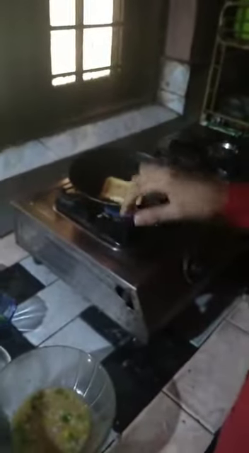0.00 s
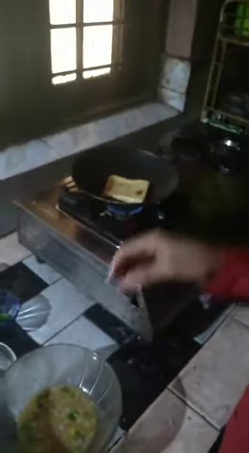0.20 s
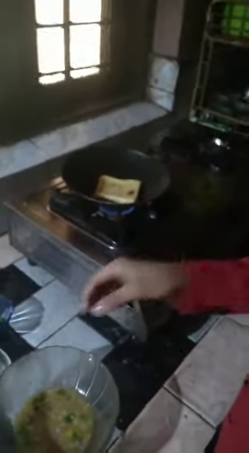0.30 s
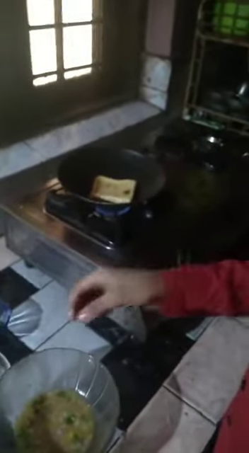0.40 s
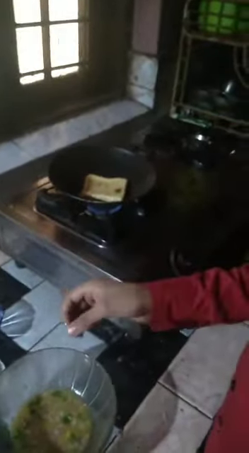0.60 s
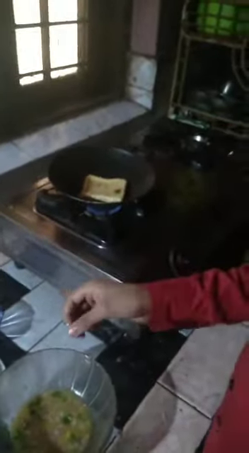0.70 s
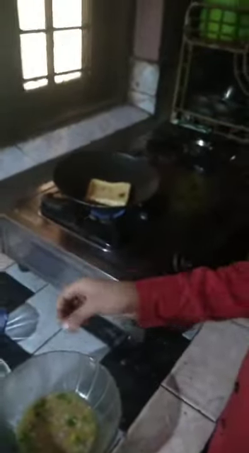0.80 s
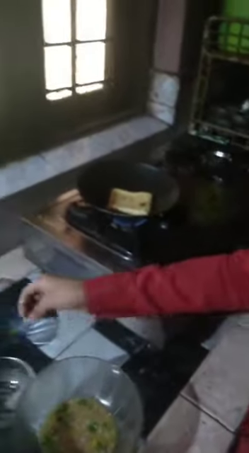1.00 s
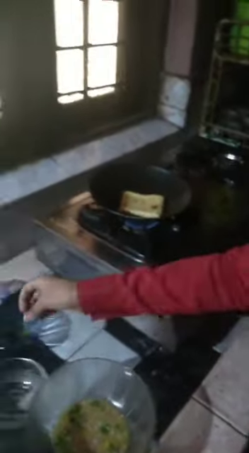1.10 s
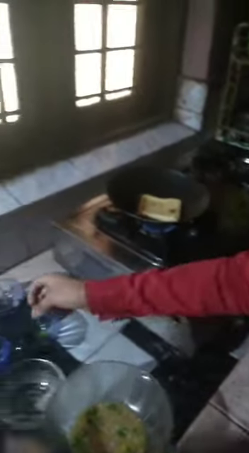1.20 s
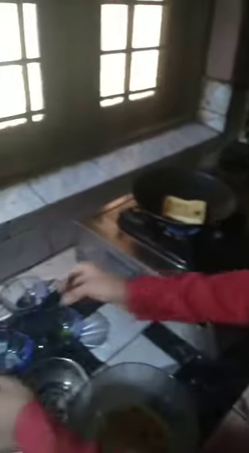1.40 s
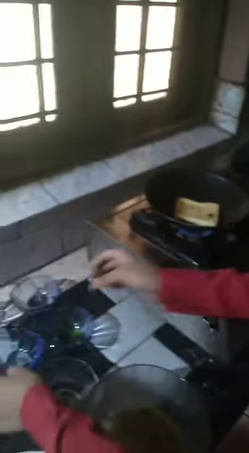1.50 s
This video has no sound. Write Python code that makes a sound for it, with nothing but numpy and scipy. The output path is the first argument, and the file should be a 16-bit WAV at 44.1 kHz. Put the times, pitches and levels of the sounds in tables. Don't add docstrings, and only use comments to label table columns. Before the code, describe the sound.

Kitchenware handling: glass clinks, one loud metallic knock, then a bowl scrapes and rattles on tiles

```python
import sys
import numpy as np
from scipy import signal
from scipy.fft import rfft, irfft
from scipy.io import wavfile
from scipy.ndimage import uniform_filter1d

SR = 44100
rng = np.random.default_rng(int(sys.argv[2]) if len(sys.argv) > 2 else 0)


def elevation(decibels):
    levels = np.asarray(decibels, float)
    return 10 ** (levels / 20)


def dump_mix(stems):
    frames = np.atleast_2d(stems).T
    limited = np.clip(frames, -1, 1)
    pcm = np.round(limited * 32767).astype(np.int16)
    wavfile.write(sys.argv[1], SR, pcm)


N = 68355
TIME = np.arange(N) / SR

# start_s, peak_db, chatter_s, crack_db, tilt_db_per_octave
KNOCKS = [
    (0.0375, -24.5, 0.026, 5.5, 0.5),
    (0.1972, -17.5, 0.0084, -2.5, -1.3),
    (.2695, -37.5, 0.0062, 6.5, -4.5),
    (0.3682, -7.5, 0.0067, 9.5, 0.63),
    (.524, -28, 0.01, 11.5, 0.5),
    (.8748, -23, 0.0075, 8, -1),
    (0.971, -37.5, 0.0097, 14, 7.5),
    (1.018, -20, 0.0061, -7, 13.5),
    (1.04, -31, 0.027, 9, 6),
]
STRUCK_OBJECT = [0, 1, 1, 2, 3, 4, 4, 5, 4]
# pitch_hz, level_db, t60_s
SMALL_BOWL = [(936, 4.5, 0.15), (1475, -26.5, 0.35), (1522, -1, 0.42), (1702, 6.5, 0.2),
              (2366, -14.5, 0.52), (3300, 7.5, 0.12), (4340, -5, 0.1), (4810, -4, 0.26), (6900, -9, 0.35),
              (7370, -14, 0.29), (7160, -33, 0.24), (8500, -30, 0.39)]
RIBBED_BOWL = [(870, -2.5, .15), (2650, -9, 0.14), (2830, -22, 0.059), (3314, -7, .1), (3350, 4, 0.16),
               (3440, 1, .1), (3684, 1, 0.12), (4540, -3, 0.26), (4900, -7, .15), (5500, -1.5, 0.11),
               (6500, -8.5, .08), (8400, -19, .1)]
SPATULA = [(926, -13.5, 0.33), (1976, -5.5, 0.3), (2450, 0.5, 0.3), (2650, -10, 0.28), (2870, -11, 0.3),
           (3500, -3.5, .1), (3890, 1.5, .08), (3980, -13, 0.033), (4610, -3, 0.22), (5430, -13, 0.17),
           (5420, -13.5, .1), (6550, -19, .1), (6960, -6, 0.1), (8900, -7, 0.076)]
DISH = [(800, 10, 0.12), (1830, 5, 0.1), (1910, 11, 0.24), (2315, 7.5, 0.11), (2820, -8, 0.089),
        (3140, 1, 0.11), (3250, 10.5, 0.11), (4600, 2, 0.089), (5370, -5, 0.18), (6740, 0, 0.074)]
BIG_BOWL = [(445, -5.5, 0.32), (1030, -25, 0.13), (1983, 13, 0.49), (2230, -0.5, 0.19), (2810, -26, .15),
            (3000, -6.5, 0.18), (3350, -15, .2), (4230, 4.5, 0.13), (5030, 0.5, 0.11), (7140, -31, .06)]
RIM = [(2074, 17, 0.093), (3330, 10, .1), (5520, -10, 0.073)]
# pitch_hz, level_db, t60_s
PAN = [(1468, -14, .3), (1870, -16.5, 0.53), (3280, -12, .3), (5030, -19, .3)]
FREE_RINGS = {0: [(941, -4, .09), (1529, -9.5, .3), (2286, -16, 0.4), (2525, -14.5, .18), (4100, -14, .25),
              (6850, -22, .26)], 3: [(845, -15.5, .5), (1045, -14.5, .1), (1946, -4.5, .25),
              (2336, -10.5, 0.22), (2480, -9, .17), (2815, -24.5, .4), (4340, -15, .29), (5450, -16, 0.21)]}
# freq_hz, level_db_per_hz
CRACK = [(150, -37.5), (300, -15.5), (650, -33.5), (1000, -1), (1300, -24), (2200, -3.5), (5300, -13.5),
         (16000, -46)]
HAND_DAMPING, LONGEST_RING_S, CONTACT_RISE_S = 0.2, 0.3, 0.0004
PAN_SHAKERS = 4


def knocks():
    objects = [SMALL_BOWL, RIBBED_BOWL, SPATULA, DISH, BIG_BOWL, RIM]
    out = np.zeros((len(KNOCKS), N + SR))
    after = TIME[:SR // 2]
    for k, (start_s, peak_db, chatter_s, crack_db, tilt_db) in enumerate(KNOCKS):
        envelope = (1 - np.exp(-after / CONTACT_RISE_S)) * np.exp(-(after / chatter_s) ** 3)
        contact = even(rng.standard_normal(len(after)) * envelope)
        modes = []
        for hz, level_db, t60_s in objects[STRUCK_OBJECT[k]]:
            damped_s = HAND_DAMPING * min(t60_s, LONGEST_RING_S)
            modes.append((hz, level_db + tilt_db * np.log2(hz / 3000), damped_s))
        if k < PAN_SHAKERS:
            modes += PAN
        modes += FREE_RINGS.get(k, [])
        tones = 0
        for hz, level_db, t60_s in modes:
            tone = ring(contact, hz, t60_s)
            tones = tones + elevation(level_db) * tone / np.abs(tone).max()
        crack = colour(contact, CRACK, tilt_db)
        crack = elevation(crack_db + 9) * crack / np.abs(crack).max()
        first = int(start_s * SR)
        out[k, first:first + len(after)] = elevation(peak_db - 12) * (tones + crack)
    return out[:, :N]


# start_s, level_db, upper_mode_hz, lower_mode_rel_db
TICKS = [(.025, -49, 2868, 1), (0.334, -33.5, 3070, -11.5), (0.3483, -36, 3350, 1.5),
         (.359, -36.5, 3500, 20.5), (0.3681, -7.5, 3430, -15.5), (.372, -10.5, 3675, -1.5),
         (.648, -52, 3120, 12), (0.663, -49, 3300, 14.5), (0.677, -42.5, 3300, 8), (0.697, -40, 3300, 7),
         (0.886, -28, 3260, 7), (0.893, -26, 3310, -1), (0.8992, -35, 3200, 7), (0.91, -34, 3240, 6),
         (0.9542, -31.5, 3210, -10), (0.9627, -32, 3210, -20), (.9725, -29.5, 3420, -7),
         (.984, -36.5, 3350, 1), (1.006, -52, 3460, 4), (1.0421, -23, 3490, -4), (1.0485, -18.5, 3466, -5),
         (1.053, -26, 3500, 2.5), (1.062, -23.5, 3350, 1), (1.087, -30, 3190, -3), (1.103, -23, 3300, -13),
         (1.11, -24, 3300, -13), (1.122, -24, 3350, -11), (1.132, -23.5, 4010, -20),
         (1.143, -36, 3350, -16), (1.152, -46, 3400, -7)]
TICK_LOWER_HZ, TICK_TOP_RATIO, TICK_TOP_DB = 1906, 2.1, -13.5
TICK_RISE_S, TICK_T60_S = 0.001125, 0.028
TICK_CRACK_DB, TICK_CRACK_TILT_DB = -7, 1.5
# start_s, length_s, t60_s after release
SQUEAK = (1.0185, 0.0057, 0.01)
# pitch_hz, level_db
SQUEAK_MODES = [(2070, -19.5), (3330, -17.5)]


def rocking_rim():
    ticks, clicks = np.zeros(N), np.zeros(N)
    for start_s, level_db, upper_hz, lower_db in TICKS:
        modes = [(upper_hz, level_db), (TICK_LOWER_HZ, level_db + lower_db),
                 (TICK_TOP_RATIO * upper_hz, level_db + TICK_TOP_DB)]
        ticks += burst(start_s, TICK_RISE_S, TICK_T60_S, modes)
        clicks[int(start_s * SR)] = elevation(level_db + TICK_CRACK_DB)
    crack = colour(np.r_[1, np.zeros(400)], CRACK, TICK_CRACK_TILT_DB)
    cracks = signal.fftconvolve(clicks, crack / np.abs(crack).max())[:N]
    return ticks + cracks + burst(*SQUEAK, SQUEAK_MODES)


def burst(start_s, rise_s, t60_s, modes):
    after = np.maximum(TIME - start_s, 0)
    shape = np.minimum(after / rise_s, 1) * elevation(-60 * np.clip(after - rise_s, 0, 1) / t60_s)
    return shape * sum(elevation(level_db) * np.sin(2 * np.pi * hz * after) for hz, level_db in modes)


# freq_hz, level_db_per_hz
RUB = [(88, -48.5), (150, -17), (398, -8), (566, -14), (716, -9.5), (1140, -13), (2750, -8.5), (3280, -4),
       (16000, -50.5)]
GRAINS_PER_S, GRAIN_SPREAD_DB = 3000, 3.5


def slide(pressure, body, rub_db, tilt_db=0):
    sizes = elevation(GRAIN_SPREAD_DB * np.minimum(rng.exponential(1, N), 4)) * rng.choice([-1, 1], N)
    hits = rng.random(N) < GRAINS_PER_S / SR
    grains = rms_one(sizes * hits * elevation(3.0 * drift(45)))
    start_s, pressure_db = np.transpose(pressure)
    force = elevation(np.interp(TIME, start_s, pressure_db, left=-140, right=-140))
    tones, power = 0, 0
    for hz, width_hz, level_db in body:
        shifted = np.roll(grains, rng.integers(400))
        tones = tones + elevation(level_db) * resonate(force * shifted, hz, width_hz)
        power += elevation(2 * level_db) * np.pi * width_hz / SR
    rub = force * elevation(rub_db) * rms_one(colour(grains, RUB, tilt_db))
    return tones / np.sqrt(power) + rub


# time_s, pressure_db
LIFT = [(.32, -64), (.332, -42), (.35, -41), (.366, -40), (.372, -70)]
DRAG = [(.58, -82), (.605, -50), (.63, -40), (.66, -47.5), (.695, -46.5), (.73, -51.5), (.76, -54.5)]
PUSH = [(.86, -48), (.866, -46), (.9, -36.5), (.955, -43), (1.0, -41.5), (1.016, -46), (1.045, -33),
        (1.11, -35), (1.14, -43.5), (1.153, -84)]
# pitch_hz, width_hz, level_db
LIFT_BODY = [(300, 200, -9.5), (1872, 150, 5.5), (2620, 330, -4.5), (3600, 540, -20.5)]
DRAG_BODY = [(445, 790, -7.5), (970, 140, 1), (1450, 300, -4), (1840, 300, 9), (2400, 51, 0), (3210, 80, 5),
             (3900, 660, -1), (5000, 220, -3)]
PUSH_BODY = [(186, 25, 5.5), (417, 51, -8), (1906, 220, 4.5), (2630, 60, 8), (2890, 14, 4), (3270, 20, 11),
             (3420, 26, 12.5), (3270, 16, 13), (4110, 18, 0.5), (4240, 20, 10.5), (5080, 30, 12),
             (5100, 613, 2.5), (7100, 730, -7.5)]


def slides():
    lift = slide(LIFT, LIFT_BODY, rub_db=2.5)
    drag = slide(DRAG, DRAG_BODY, rub_db=-6, tilt_db=-6)
    drag = signal.sosfilt(signal.butter(2, 6500, fs=SR, output="sos"), drag)
    return lift + drag + slide(PUSH, PUSH_BODY, rub_db=1.5)


# start_s, level_db
THUDS = [
    (.045, -33.5),
    (0.341, -30.5),
    (0.862, -33.5),
    (0.973, -36),
]
THUD_HZ, THUD_T60_S = 270, 0.059


def thuds():
    pushes = np.zeros(N)
    for start_s, level_db in THUDS:
        pushes[int(start_s * SR)] = elevation(level_db)
    return ring(pushes, THUD_HZ, THUD_T60_S) + ring(pushes, 1.4 * THUD_HZ, THUD_T60_S)


# start_s, level_db, top_hz
CHIRPS = [
    (.783, -44.5, 3980),
    (1.5278, -44.5, 3890),
]
# delay_s, level_db
YARD_ECHOES = [
    (.014, 1),
    (.021, 0),
    (.034, -5),
]
CHIRP_S, CHIRP_HOLD_S, CHIRP_FALL_S = 0.032, 0.008, 0.013
CHIRP_END_HZ, CHIRP_FADE_DB, OVERTONE_DB = 2250, 8, -12


def bird():
    out = np.zeros(N)
    for start_s, level_db, top_hz in CHIRPS:
        part = np.clip((TIME - start_s) / CHIRP_S, 0, 1)
        falling_s = np.maximum(TIME - start_s - CHIRP_HOLD_S, 0)
        hz = CHIRP_END_HZ + (top_hz - CHIRP_END_HZ) * np.exp(-falling_s / CHIRP_FALL_S)
        phase = 2 * np.pi * np.cumsum(hz) / SR
        envelope = elevation(level_db - CHIRP_FADE_DB * part) * np.minimum(1, 20 * part * (1 - part))
        out += envelope * (np.sin(phase) + elevation(OVERTONE_DB) * part * np.sin(2 * phase))
    echoes = sum(elevation(level_db) * np.interp(TIME - delay_s, TIME, out) for delay_s, level_db in YARD_ECHOES)
    return out + echoes


# freq_hz, t60_s
KITCHEN = [(150, 0.5), (500, 0.32), (2000, 0.35), (5000, 0.32), (9000, 0.25), (15000, 0.13)]
FIRST_ECHO_S, ROOM_BUILD_S = 0.0036, 0.0011


def kitchen(x):
    after = TIME[:SR // 2]
    edges_hz = 80 * 2 ** np.arange(0, 8, 0.5)
    white = rng.standard_normal((2, len(after)))
    echoes = 0
    for k, (low_hz, high_hz) in enumerate(zip(edges_hz, edges_hz[1:])):
        sos = signal.butter(2, [low_hz, high_hz], "band", fs=SR, output="sos")
        band = signal.sosfilt(sos, white[k % 2])
        t60_s = at_hz(KITCHEN, np.sqrt(low_hz * high_hz))
        echoes = echoes + band * elevation(-60 * after / t60_s) / np.sqrt(t60_s)
    build = 1 - np.exp(-np.maximum(after - FIRST_ECHO_S, 0) / ROOM_BUILD_S)
    echoes = even(echoes * build)
    return signal.fftconvolve(x, echoes / np.sqrt(np.sum(echoes ** 2)))[:N]


# freq_hz, level_db_per_hz
HISS = [(88, -12.5), (150, -5.5), (197, -13.5), (280, -6), (354, -13), (439, -8), (544, -13), (16000, -34)]
# time_s, level_db
RUMBLE = [(0.0, -65), (0.082, -53), (0.336, -53), (0.392, -54), (0.508, -51.5), (0.534, -52.5),
          (0.974, -55), (0.992, -57), (1.018, -52), (1.134, -43.5), (1.16, -65), (1.238, -58.5),
          (1.32, -49), (1.36, -74), (1.45, -45), (1.506, -66), (1.528, -57), (1.55, -48)]
HISS_DB, RUMBLE_HZ, RUMBLE_WIDTH_HZ = -62, 75.3, 16


def background():
    hiss = rms_one(colour(rng.standard_normal(N + SR), HISS)[SR:]) * elevation(0.85 * drift(2.4))
    low = resonate(rng.standard_normal(N + SR), RUMBLE_HZ, RUMBLE_WIDTH_HZ)
    low = resonate(low, RUMBLE_HZ, 2 * RUMBLE_WIDTH_HZ)[SR:]
    low = low / np.sqrt(uniform_filter1d(low ** 2, size=3000) + 0.2 * np.mean(low ** 2))
    return elevation(HISS_DB) * hiss + elevation(np.interp(TIME, *np.transpose(RUMBLE))) * low


def ring(x, hz, t60_s):
    r, w = elevation(-60 / (t60_s * SR)), 2 * np.pi * hz / SR
    return signal.lfilter([0, np.sin(w)], [1, -2 * r * np.cos(w), r * r], x + 1e-18)


def resonate(x, hz, width_hz):
    r, w = np.exp(-np.pi * width_hz / SR), 2 * np.pi * hz / SR
    return signal.lfilter(np.array([1, 0, -1]) * (1 - r * r) / 2, [1, -2 * r * np.cos(w), r * r], x)


def drift(rate_hz):
    r = np.exp(-2 * np.pi * rate_hz / SR)
    return rms_one(signal.lfilter([1], [1, -2 * r, r * r], rng.standard_normal(N + SR))[SR:])


def colour(x, spectrum, tilt_db=0):
    hz = np.arange(1025) * SR / 2048
    level_db = at_hz(spectrum, hz) + tilt_db * np.log2((hz + 50) / 3000)
    cepstrum = irfft(np.log(elevation(level_db)))
    cepstrum[1:1024] *= 2
    cepstrum[1025:] = 0
    return signal.fftconvolve(x, irfft(np.exp(rfft(cepstrum))))[:len(x)]


def even(x):
    power = uniform_filter1d(np.abs(rfft(x)) ** 2, size=int(170 * len(x) / SR))
    hz = np.arange(1, len(power)) * SR / len(x)
    inverse_db = -10 * np.log10(power[1:] + 1e-4 * power.max())
    return colour(x, np.transpose([hz, inverse_db]))


def at_hz(points, hz):
    points = np.array(points)
    return np.interp(np.log(hz + 1), np.log(points[:, 0]), points[:, 1])


def high_pass(x, hz):
    return signal.sosfilt(signal.butter(2, hz, "high", fs=SR, output="sos"), x)


def rms_one(x):
    return x / np.sqrt(np.mean(x ** 2) + 1e-20)


DIRECT_LOW_CUT_HZ, BIRD_DIRECT_DB = 830, -9
ROOM_DB, TICK_ROOM_DB = -1.5, -9
SIDE_KNOCKS = [0, 3]
SIDE_DB, SIDE_LOW_CUT_HZ = -6, 7000


def scene():
    blows = knocks()
    counter = blows.sum(axis=0) + thuds() + slides()
    chirps, rim = bird(), rocking_rim()
    direct = high_pass(counter, DIRECT_LOW_CUT_HZ) + rim + elevation(BIRD_DIRECT_DB) * chirps
    room = kitchen(elevation(ROOM_DB) * counter + elevation(TICK_ROOM_DB) * rim + chirps)
    mono = direct + room + background()
    treble = high_pass(high_pass(blows[SIDE_KNOCKS].sum(axis=0), SIDE_LOW_CUT_HZ), SIDE_LOW_CUT_HZ)
    side = elevation(SIDE_DB) * np.roll(treble, 9)
    return np.array([mono + side, mono - side])


def top_cut(x):
    return signal.sosfilt(signal.butter(12, 16120, fs=SR, output="sos"), x)


CEILING, CUTOFF_HZ = 1.25, 16500


def record(dry):
    rounded = CEILING * np.tanh(dry / CEILING)
    mix = signal.sosfilt(signal.cheby2(12, 70, CUTOFF_HZ, fs=SR, output="sos"), rounded)
    return top_cut(mix)


dry = scene()
out = record(dry)
dump_mix(out)
```